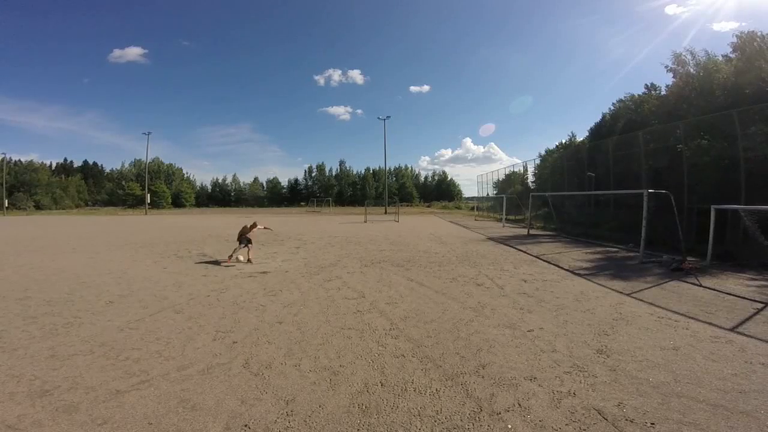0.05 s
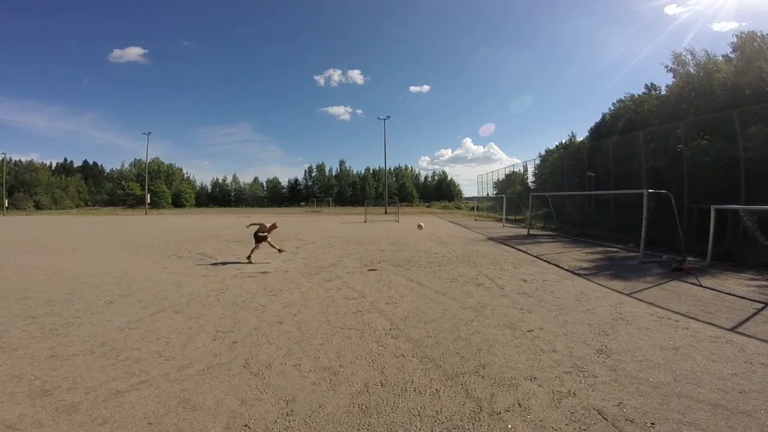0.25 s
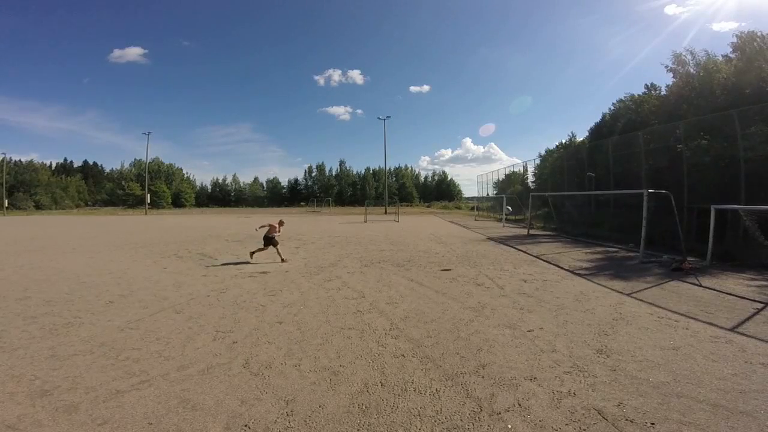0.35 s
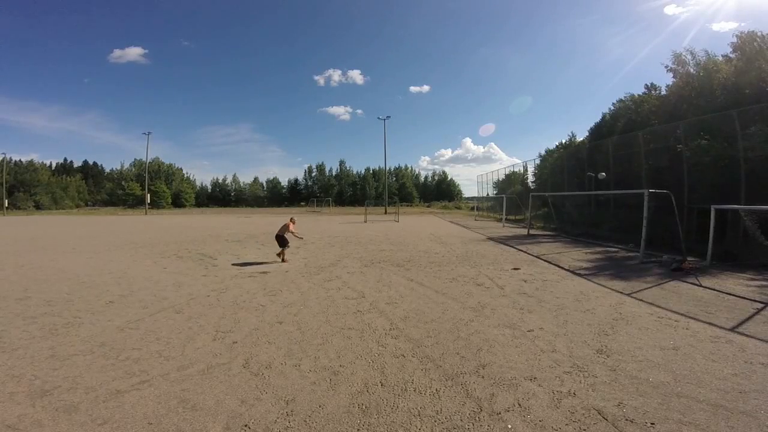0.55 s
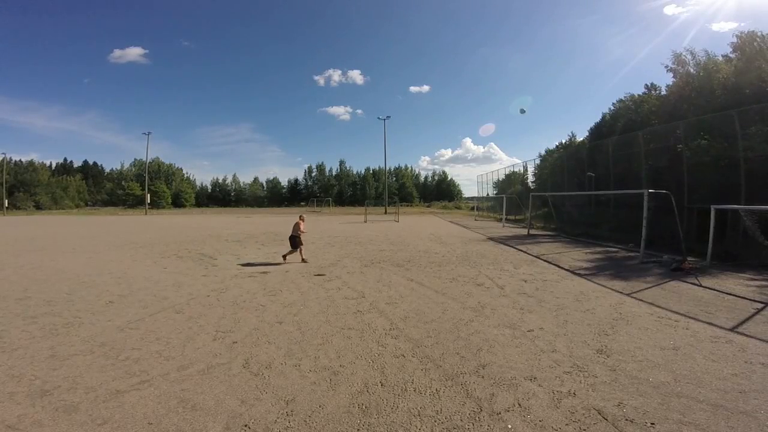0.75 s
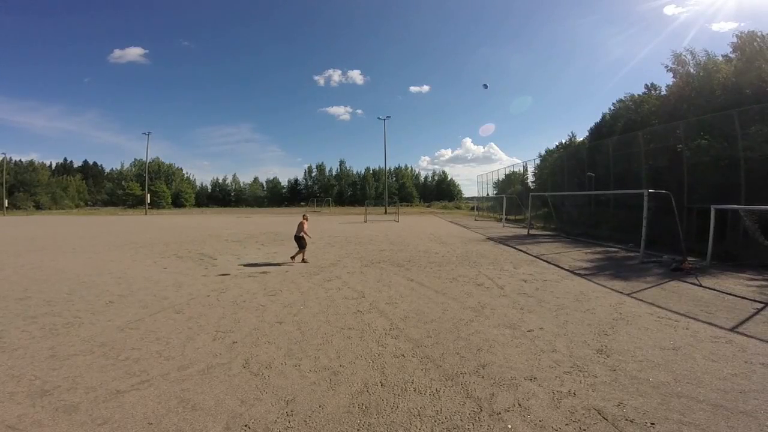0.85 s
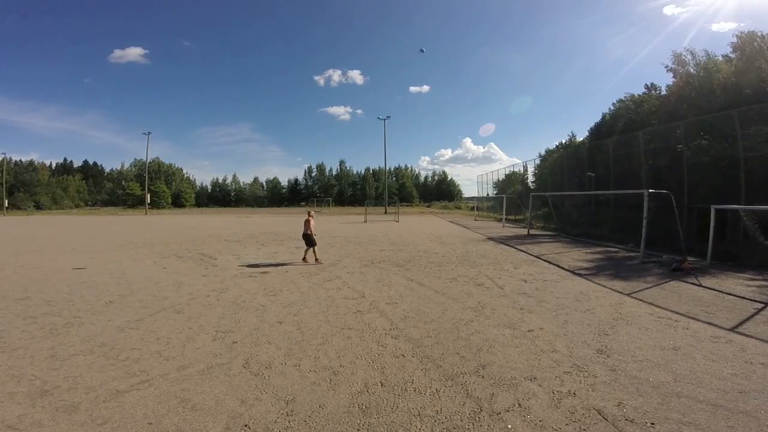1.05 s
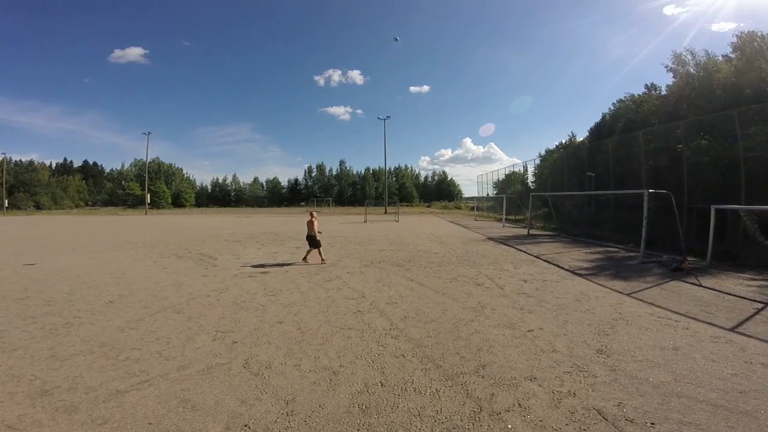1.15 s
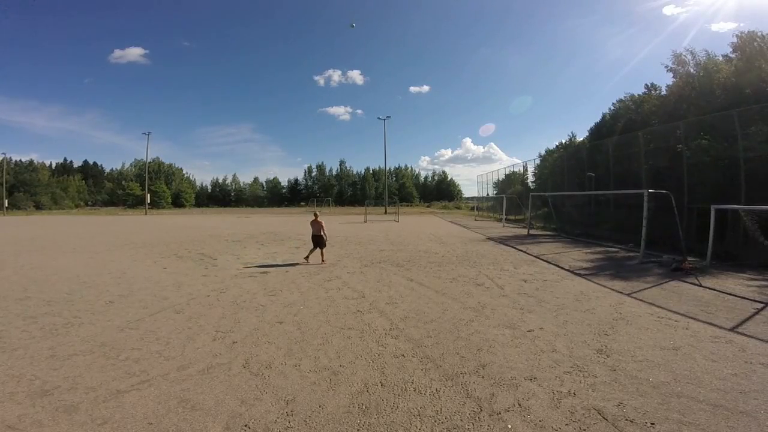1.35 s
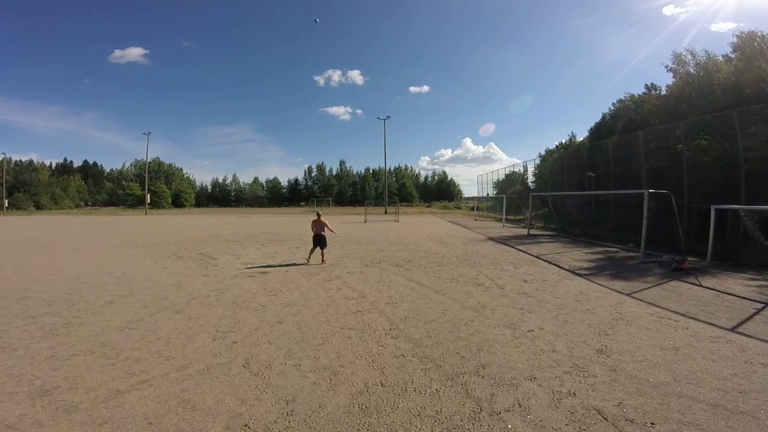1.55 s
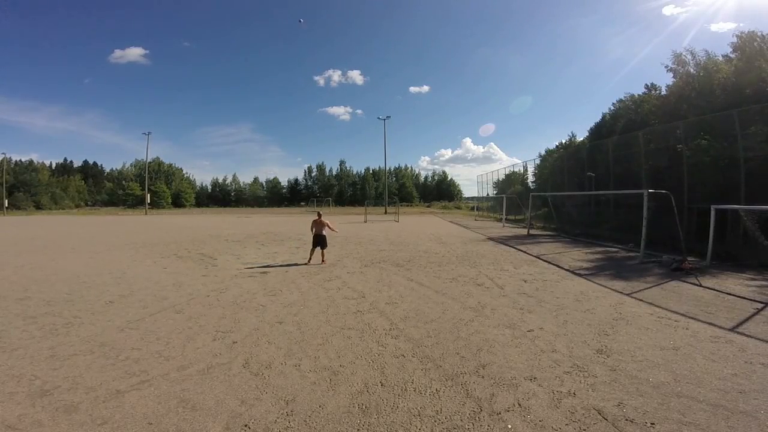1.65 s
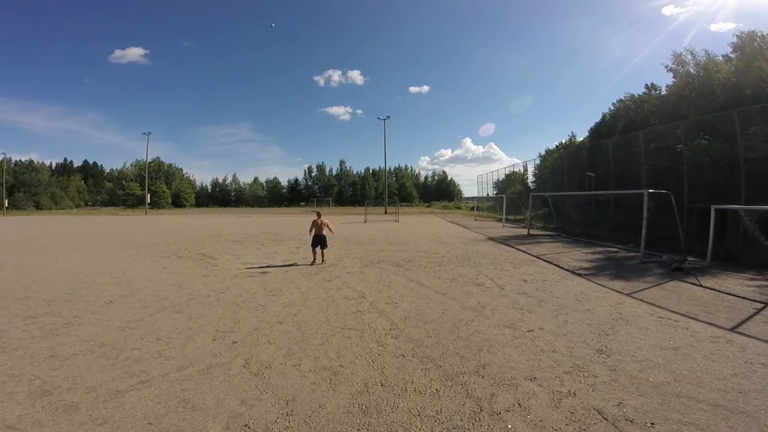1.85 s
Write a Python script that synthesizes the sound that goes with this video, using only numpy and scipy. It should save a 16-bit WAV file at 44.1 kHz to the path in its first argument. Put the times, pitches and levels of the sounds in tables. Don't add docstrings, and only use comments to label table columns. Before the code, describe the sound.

Gravel crunches, a boot thumps a ball hard enough to overload the small housed camera microphone, another footfall lands, then the ball smacks a steel goal, whose joints and mesh clatter briefly over quiet outdoor air.

```python
import sys
import numpy as np
from scipy import signal
from scipy.io import wavfile

SR = 44100
rng = np.random.default_rng(int(sys.argv[2]) if len(sys.argv) > 2 else 0)


def to_wav(sig):
    pcm = np.clip(np.atleast_2d(sig), -1, 1) * 32767
    pcm = np.round(pcm).astype(np.int16)
    wavfile.write(sys.argv[1], SR, pcm.T)


def convert_level_to_amplitude(level_db):
    exponent = np.asarray(level_db, float) / 20
    return 10 ** exponent


N = 83790


def at_hz(points, hz):
    table_hz, values = np.transpose(points)
    return np.interp(np.log(hz), np.log(table_hz), values)


def rms_one(x):
    return x / np.sqrt(np.mean(x ** 2) + 1e-20)


def since(start_s):
    return np.arange(N) / SR - start_s


def low_pass(x, hz):
    return signal.sosfilt(signal.butter(2, min(hz, 20000), fs=SR, output="sos"), x + 1e-18)


def band_pass(x, low_hz, high_hz):
    return signal.sosfilt(signal.butter(2, [low_hz, high_hz], "band", fs=SR, output="sos"), x)


def resonator(hz, decay):
    return [1, -2 * decay * np.cos(2 * np.pi * hz / SR), decay * decay]


def drift(rate_hz):
    r = np.exp(-80 * np.pi * rate_hz / SR)
    noise = rng.standard_normal(N // 40 + 2002)
    slow = signal.lfilter([1], [1, -2 * r, r * r], noise)[2000:]
    return np.interp(np.arange(N) / 40, np.arange(len(slow)), rms_one(slow))


def ring(clicks, hz, t60_s):
    decay = convert_level_to_amplitude(-60 / (t60_s * SR))
    return signal.lfilter([0, np.sin(2 * np.pi * hz / SR)], resonator(hz, decay), clicks + 1e-18)


def clicks_at(rows):
    out = np.zeros(N)
    for s, db in rows:
        out[int(s * SR)] += convert_level_to_amplitude(db)
    return out


def grains(rate_per_s, spread_db):
    size = convert_level_to_amplitude(spread_db * np.minimum(rng.exponential(1, N), 4)) * rng.choice([-1, 1], N)
    return rms_one(size * (rng.random(N) < rate_per_s / SR))


def bank(sources, spectrum, gain_db):
    edges_hz = 20 * 2 ** np.arange(0, 9.9, 1 / 3)
    out, power = 0, 0
    for k, (low, high) in enumerate(zip(edges_hz, edges_hz[1:])):
        hz = np.sqrt(low * high)
        level_db = at_hz(spectrum, hz)
        out = out + convert_level_to_amplitude(level_db + gain_db(hz)) * band_pass(sources[k % 2], low, high)
        power += convert_level_to_amplitude(2 * level_db) * (high - low) / (SR / 2)
    return out / np.sqrt(power)


# frequency in Hz, level in dB per Hz.
TRAFFIC_COLOUR = [(15, -47), (25, 2.5), (180, -7), (451, -13.5), (1020, -8), (1370, -16.5), (2050, -25),
                  (14400, -52.5), (16000, -82)]
TRAFFIC_DB, WIND_DB, WIND_HZ, GUST_DB = -44, -49.5, 108.5, 3


def background():
    together = drift(4.5)
    far = bank(rng.standard_normal((2, N)), TRAFFIC_COLOUR, lambda hz: 0.27 * together + 0.4 * drift(9.1))
    wind = rms_one(band_pass(rng.standard_normal(N), WIND_HZ / 2, WIND_HZ * 1.4))
    return convert_level_to_amplitude(TRAFFIC_DB) * far + convert_level_to_amplitude(WIND_DB + GUST_DB * drift(2.1)) * wind


# start in s, length in s, level in dB, centre in Hz.
RETURNS = [(0.234, 0.13, -45, 730), (0.33, 0.12, -64, 5200), (2.4, .07, -78, 2700), (.112, .035, -54, 1800),
           (.193, 0.017, -37, 1500), (.488, 0.027, -50.5, 1800), (0.686, 0.11, -29, 2440),
           (1.234, 0.48, -48, 1100), (0.83, 0.33, -55, 4600), (0.66, 0.12, -63, 8800),
           (0.043, 0.047, -47.5, 300), (0.92, 0.16, -48, 135)]


def returns():
    out = 0
    for s, length_s, db, hz in RETURNS:
        noise = rms_one(band_pass(rng.standard_normal(N), hz / 1.4, hz * 1.4))
        swell = np.sin(np.pi * np.clip(since(s) / length_s, 0, 1) ** 0.43)
        out = out + convert_level_to_amplitude(db) * noise * swell
    return out


# start in s, peak in dB, hardness in Hz.
STEPS = [
    (0.1089, -25, 1480),
    (0.1198, -27.5, 1700),
    (0.1252, -29, 2470),
    (.1938, -41, 4000),
    (.1999, -27.5, 12000),
    (0.2012, -26.5, 12300),
    (0.4927, -23, 1480),
    (0.5046, -33, 2360),
    (0.5053, -23.5, 1830),
    (.572, -41, 1520),
]
# frequency in Hz, level in dB, t60 in s.
SOLE = [(400, -8.5, 0.024), (790, 4, 0.0074), (1944, -11.5, 0.0057), (3040, -10, 0.0017), (5030, -32, .004)]


def steps():
    out = 0
    for s, db, hardness_hz in STEPS:
        knock = 0
        for hz, level_db, t60_s in SOLE:
            click = clicks_at([(s, db + level_db + rng.normal(0, 1.7))])
            knock = knock + ring(click, hz, t60_s)
        out = out + np.sign(hardness_hz - 2000) * low_pass(knock, hardness_hz)
    return out


# start in s, level in dB, squash pitch in Hz, squash length in s,
# slap in dB, skin ring in dB.
BLOWS = [
    (0.215, 3, 162, 0.0075, -23.5, 0),
    (0.6688, -9, 118.5, .0125, -17, -6),
]
# frequency in Hz, level in dB, t60 in s.
BALL_MODES = [(353, -22.5, 0.062), (519, -24.5, 0.061), (639, -15, 0.036), (783, -29, 0.0097),
              (2410, -38, 0.087), (3410, -31.5, 0.027), (8280, -34, 0.01)]
# frequency in Hz, level in dB per Hz.
SLAP_COLOUR = [(200, 1.5), (800, 19), (1300, -1), (3000, 3), (6000, -16), (8500, -9), (12000, -46),
               (16500, -13)]
FIRST_TOUCH_S, TOUCH_DB, SLAP_T60_S, SLAP_RISE_S = 0.00137, -8, 0.06, 0.00068


def ball():
    out = 0
    slap = bank(rng.standard_normal((2, N)), SLAP_COLOUR, lambda hz: 0)
    for s, db, squash_hz, squash_s, slap_db, skin_db in BLOWS:
        t = since(s)
        touch = convert_level_to_amplitude(TOUCH_DB) * np.sin(np.pi * np.clip(t / FIRST_TOUCH_S, 0, 1))
        u = t - FIRST_TOUCH_S
        contact = np.sin(np.pi * np.clip(u / squash_s, 0, 1)).clip(0) ** 0.67
        push = touch - np.sin(2 * np.pi * squash_hz * u) * contact
        push = push - contact * push.sum() / contact.sum()
        skin = 0
        for hz, level_db, t60_s in BALL_MODES:
            skin = skin + ring(low_pass(clicks_at([(s, level_db)]), 8200), hz, t60_s)
        slap_fade = np.clip(t / SLAP_RISE_S, 0, 1) * convert_level_to_amplitude(slap_db - 60 * t.clip(0) / SLAP_T60_S)
        out = out + convert_level_to_amplitude(db) * (push + convert_level_to_amplitude(skin_db) * skin) + slap * slap_fade
    return out


# start in s, level in dB.
CRACKS = [
    (0.6682, -24),
    (0.67, -21.5),
]
# frequency in Hz, level in dB, t60 in s.
DENT = [(338.6, -10.5, 0.059), (753, -9.5, 0.053), (1537, -21, 0.035), (2930, -23, 0.011),
        (4500, -28, 0.0076)]
CRACK_T60_S, CRACK_HZ = 0.0048, 6500


def strike():
    noise = low_pass(rng.standard_normal(N), CRACK_HZ)
    noise = rms_one(low_pass(noise, 1.04 * CRACK_HZ))
    fade = 0
    for s, db in CRACKS:
        t = since(s)
        fade = fade + (t > 0) * convert_level_to_amplitude(db - 60 * t.clip(0) / CRACK_T60_S)
    out = noise * fade
    for hz, db, t60_s in DENT:
        out = out + ring(low_pass(clicks_at([(CRACKS[0][0], db)]), 6200), hz, t60_s)
    return out


# frequency in Hz, level in dB, t60 in s.
FRAME = [(339, -4, 0.076), (500, -4, 0.084), (763, 2.5, 0.061), (858, -5, 0.064), (1590, -7, 0.091),
         (2033, -10.5, 0.082), (2342, -10, 0.092), (2667, -7, 0.074), (4480, -17, 0.018),
         (6187, -13.5, 0.033), (6700, -22, 0.051), (7214, -16.5, 0.035), (9740, -20.5, 0.014),
         (13200, -32, .004)]
# time in s, level in dB.
SHAKE = [(.672, -10), (0.686, -20.5), (0.711, -18), (.735, -20.5), (.808, -25), (.9, -32.5), (.99, -40.5),
         (1.18, -49), (1.35, -62)]
# start in s, level in dB.
REKNOCKS = [(.6712, -34), (.6768, -26), (0.679, -30), (.702, -27.5), (.712, -22), (0.73, -20), (.77, -24.5),
            (.808, -29), (.98, -39.5)]
# frequency in Hz, level in dB per Hz.
CLATTER_COLOUR = [(80, -7), (150, 0), (355, -2), (800, -2), (2400, -15), (3600, -25), (8500, -34),
                  (15500, -71)]
# frequency in Hz, extra loss in dB per s.
CLATTER_LOSS = [(150, 40), (500, 3.5), (2000, -6), (6000, -11), (14000, 37)]
FRAME_DB, FRAME_LOSS_DB_PER_S, KNOCK_HZ = -24.5, 20.5, 5000
RATTLES_PER_S, RATTLE_LAG_S, TWIN_SPREAD = 1200, 0.008, 0.006
CLATTER_DB, CLATTER_RISE_S, CLINKS_PER_S = -1, 0.012, 7000


def goal():
    t = since(BLOWS[1][0])
    shake_s, shake_levels_db = np.transpose(SHAKE)
    shake_db = np.interp(since(0), shake_s, shake_levels_db) - 60 * since(shake_s[-1]).clip(0)
    frame = 0
    for hz, level_db, t60_s in FRAME:
        flicker_db = 3 * drift(20)
        rattle_db = shake_db + flicker_db - FRAME_LOSS_DB_PER_S * t.clip(0)
        for detune in (-1, 0.2, 1):
            rattle = grains(RATTLES_PER_S, 1.9) * convert_level_to_amplitude(rattle_db) * (t > RATTLE_LAG_S)
            rattle = rattle / np.sqrt(t60_s * SR / 28)
            uneven = [(s, db + rng.normal(0, 2.8)) for s, db in REKNOCKS]
            knocks = low_pass(clicks_at(uneven), KNOCK_HZ)
            drive = convert_level_to_amplitude(FRAME_DB + 18) * rattle + knocks
            frame = frame + convert_level_to_amplitude(level_db - 8.5) * ring(drive, hz * (1 + TWIN_SPREAD * detune), t60_s)

    def clatter_gain_db(hz):
        return -at_hz(CLATTER_LOSS, hz) * np.clip(t, 0, 0.8) + 2 * drift(31)

    clinks = [grains(CLINKS_PER_S, 4.1) for _ in range(2)]
    clatter = bank(clinks, CLATTER_COLOUR, clatter_gain_db)
    rise = np.clip(t / CLATTER_RISE_S, 0, 1)
    return frame + rise * convert_level_to_amplitude(CLATTER_DB + shake_db) * clatter


def scene():
    brief = steps() + ball() + strike()
    lasting = goal() + returns() + background()
    air = signal.cheby2(14, 40, 15600, fs=SR, output="sos")
    return (brief + signal.sosfilt(air, lasting))[None]


def top_cut(x):
    return signal.sosfilt(signal.butter(12, 16600, fs=SR, output="sos"), x)


# frequency in Hz, width in Hz, share added.
HOUSING = [(1250, 870, -0.75), (2170, 340, 0.71), (3056, 1830, -0.14), (8850, 2300, -0.22)]
LOW_CUT_HZ, CUTOFF_HZ, OVERLOAD_PEAK = 34, 16900, 1.0


def record(dry):
    x = signal.sosfilt(signal.butter(2, LOW_CUT_HZ, "high", fs=SR, output="sos"), dry)
    for hz, width_hz, share in HOUSING:
        decay = np.exp(-np.pi * width_hz / SR)
        inlet = (1 - decay * decay) / 2 * np.array([1, 0, -1])
        x = x + share * signal.lfilter(inlet, resonator(hz, decay), x)
    x = x / (1 + np.abs(x / OVERLOAD_PEAK) ** 12) ** (1 / 12)
    x = signal.sosfilt(signal.cheby2(12, 60, CUTOFF_HZ, fs=SR, output="sos"), x)
    return top_cut(x)


dry = scene()
out = record(dry)
to_wav(out)
```